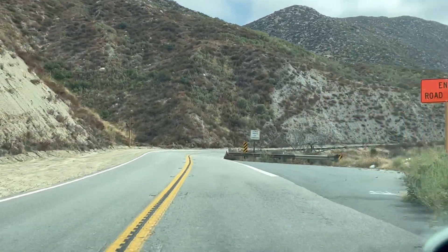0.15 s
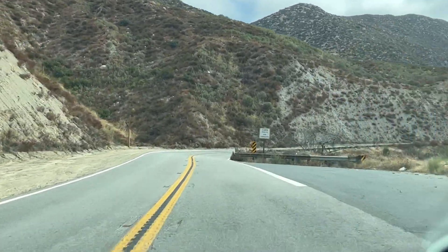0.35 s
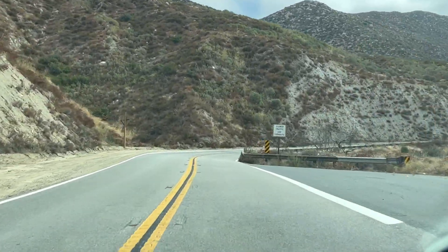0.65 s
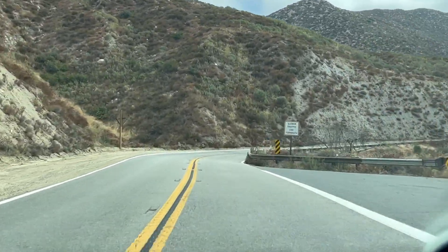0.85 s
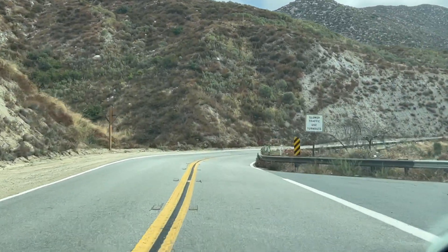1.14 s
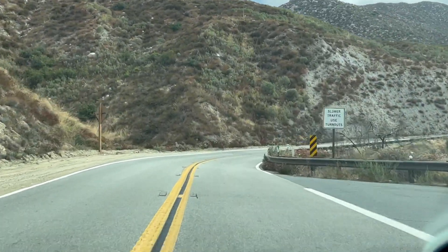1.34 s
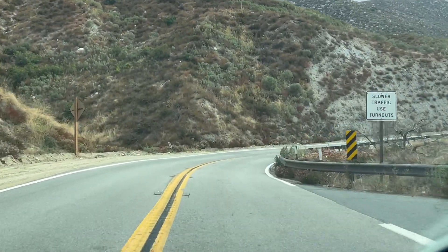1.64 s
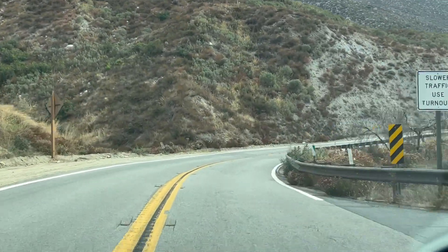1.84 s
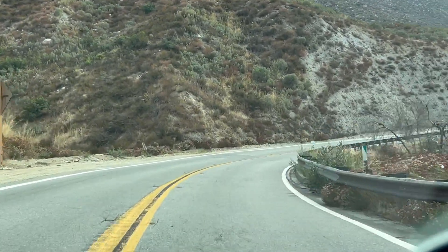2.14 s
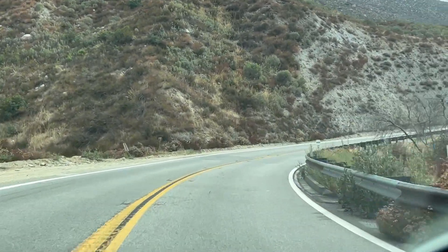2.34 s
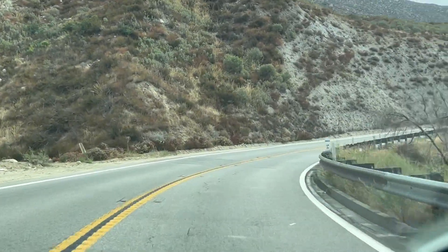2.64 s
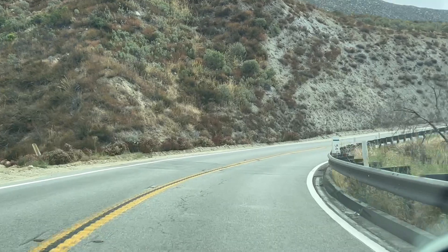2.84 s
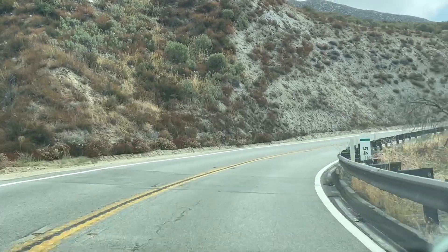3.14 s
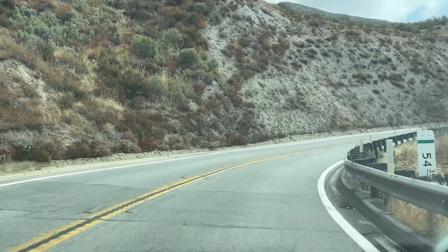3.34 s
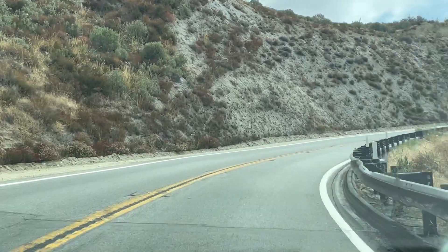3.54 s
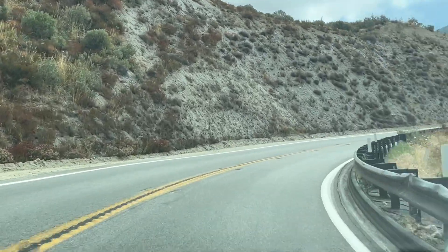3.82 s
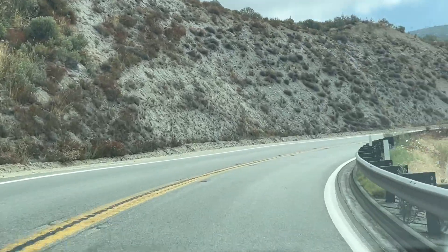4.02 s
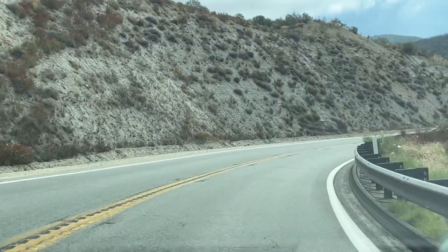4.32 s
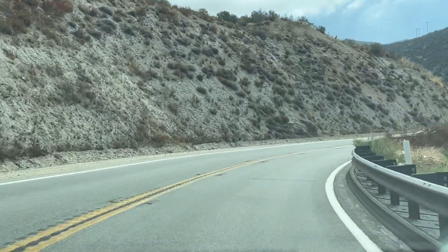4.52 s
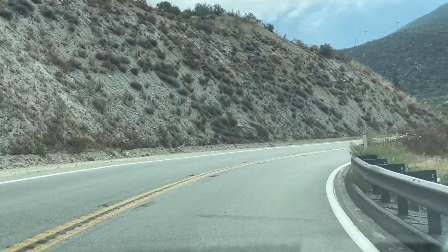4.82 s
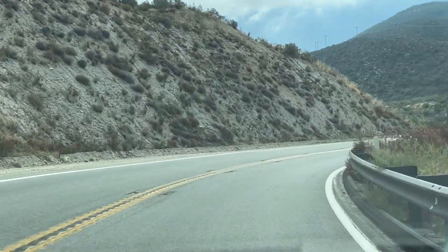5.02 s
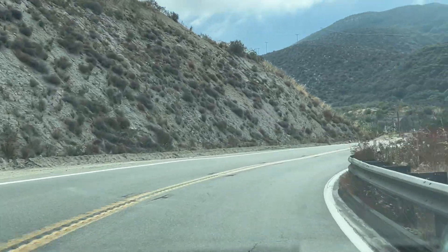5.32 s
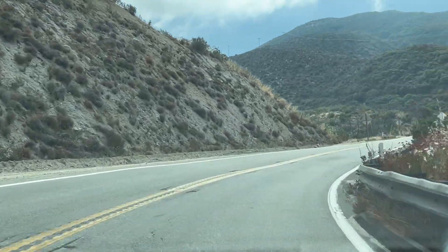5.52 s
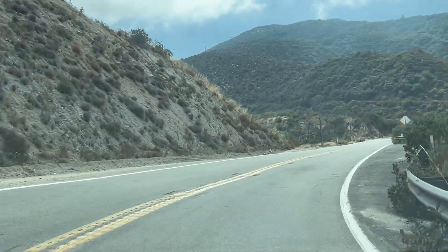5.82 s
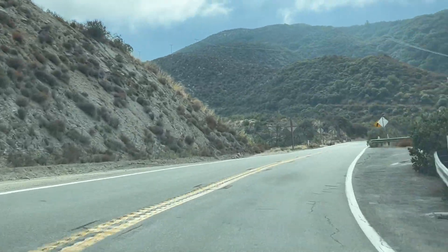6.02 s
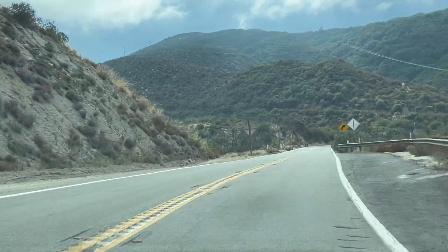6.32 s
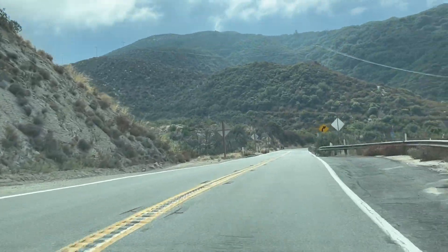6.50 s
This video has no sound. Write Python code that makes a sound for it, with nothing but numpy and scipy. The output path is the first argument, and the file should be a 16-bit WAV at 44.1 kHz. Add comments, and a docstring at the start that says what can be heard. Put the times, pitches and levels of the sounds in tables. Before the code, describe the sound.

Heard inside a moving car on a mountain road, close stereo microphone. Low tyre rumble underlies a closed-throttle engine burbling, with about sixteen irregular exhaust pops and thumps in the first two seconds. The boom then dips briefly and returns as the throttle opens, pulling through the bend with gently rising pitch, thickening growl and breathy intake hiss. Small hitches interrupt the note, and it throbs at the end.

```python
"""Inside a turbo four-cylinder car on a mountain road, heard by a pair of microphone ports.
With the throttle shut the exhaust burbles in thirds of the firing rate over shaped road noise, and
afterfire pops as noise bursts ringing the pipe. Then the throttle opens and the boom returns; the
revs climb as cosine orders of the firing rate, the intake hisses with boost as coloured noise, the
note skips, and near the top of the pull some orders throb."""
import sys
import numpy as np
from scipy import signal
from scipy.fft import rfft, irfft
from scipy.io import wavfile
from scipy.ndimage import uniform_filter1d

SR = 44100
rng = np.random.default_rng(int(sys.argv[2]) if len(sys.argv) > 2 else 0)


def dump_mix(stems):
    """Bounce the given channels to the path in sys.argv[1] as a 16-bit WAV at rate SR."""
    frames = np.atleast_2d(stems).T  # one column per channel
    limited = np.clip(frames, -1, 1)  # hard clip at full scale
    pcm = np.round(limited * 32767).astype(np.int16)
    wavfile.write(sys.argv[1], SR, pcm)


def magnitude_from_level(level_db):
    """Linear magnitude for a level in decibels (20 dB per decade)."""
    exponent = np.asarray(level_db, float) / 20
    return 10 ** exponent


N = 293706
T = np.arange(N) / SR
OPEN_S, OPEN_OVER_S = 2.15, .05  # when the throttle opens, and the time scale of opening
PORT = np.array([[.5], [-.5]])  # shares a left-right difference between the two ports

# Firing and its two strongest orders: time_s, firing_rate_hz, boom_db, second_order_db
ENGINE = [(0.0, 122.2, -22, -38.5), (0.42, 120.4, -21.5, -47), (0.49, 120.1, -15, -49.5),
          (0.8, 120.7, -15.5, -43.5), (1.3, 117.2, -14, -39.5), (1.84, 115.2, -13, -31.5),
          (1.9, 114.6, -18.5, -34), (2.2, 112, -18.5, -27), (2.3, 112.9, -12.5, -29),
          (2.5, 112.4, -13.5, -30), (2.75, 113.3, -11, -27.5), (3.15, 114.2, -10.5, -25),
          (3.65, 115.8, -11, -27.5), (3.9, 116.2, -10, -29), (4.1, 116.7, -12, -30.5), (4.5, 118, -11, -28),
          (5.1, 121, -8.5, -21.5), (5.5, 123.1, -9.5, -25), (5.92, 125.7, -12, -28),
          (6.3, 128.4, -11, -22.5), (6.66, 129.2, -10, -22.5)]
# Strongest orders: multiple of the firing rate
MAJOR_ORDERS = [1, 2, 3, 4, 5, 6, 6.5, 7]
# Afterfire: start_s, crack_db, thump_db, crack_colour_hz, boom_sag_db
POPS = [(0.365, -56, -38, 1280, 0.5), (0.424, -53, -38.5, 1400, -3), (0.601, -28.5, -18, 1675, 8.5),
        (0.623, -24.5, -31, 2320, -2), (0.719, -41, -26.5, 1316, -1.5), (0.84, -43, -24.5, 1560, 9),
        (0.876, -47, -30.5, 3200, -3), (0.981, -36.5, -27, 1560, 7), (1.018, -47, -37.5, 3700, -2),
        (1.129, -30.5, -17.5, 2100, 4.5), (1.178, -41, -34.5, 2682, 3), (1.268, -32.5, -24, 1347, 10),
        (1.414, -31.5, -20.5, 1300, 8), (1.6, -31, -22, 1220, 12), (1.831, -38, -23, 1502, 11.5),
        (1.942, -46, -32.5, 1180, 1.5)]
# Resonances of the panels: centre_hz, width_hz, level_db
PANELS = [(1040, 83, 1.5), (1120, 140, 5.5), (1363, 44, 4.5), (1716, 45, 7), (1953, 39, 7.5), (2100, 50, 4),
          (2500, 200, 6), (3070, 120, 2), (3397, 140, 4), (3650, 60, 2.5)]
# Where the upper half orders stand out: firing_rate_hz, width_hz, lift_db
UNEVEN = (115, 2.7, 7)


def evened(x):
    """Normalisation: scales to rms 1."""
    return x / np.sqrt(np.mean(x ** 2) + 1e-20)


def read(points, hz):
    """Interpolation on a logarithmic frequency axis, as pitch is heard."""
    f, value = np.transpose(points)
    return np.interp(np.log(hz + 1), np.log(f + 1), value)


def columns(rows):
    """Linear interpolation in time: each curve of a table at every sample."""
    s, *values = np.transpose(rows)
    return [np.interp(T, s, v) for v in values]


def drift(hz):
    """Low-passed noise: slow chance up to hz, rms 1."""
    low_pass = signal.butter(2, hz, fs=SR, output="sos")
    return evened(signal.sosfilt(low_pass, rng.standard_normal(N)))


def hump(hz, centre_hz, width_hz, db):
    """Resonance curve: a bell of db around a frequency."""
    return db / (1 + (2 * (hz - centre_hz) / width_hz) ** 2)


def ring(x, modes):
    """Modal superposition: x passes steep resonances (centre_hz, width_hz, level_db) side by side."""
    out = np.zeros_like(x)
    for hz, width_hz, db in modes:
        peak = signal.iirpeak(hz, hz / width_hz, SR)
        once = signal.lfilter(*peak, x)
        out += magnitude_from_level(db) * signal.lfilter(*peak, once)
    return out


def noise(spectrum, patchy_db, boosts=()):
    """Filtered noise: two draws share a spectrum whose patches drift in time and frequency."""
    hz = np.fft.rfftfreq(1024, 1 / SR)
    real, imaginary, patches = rng.standard_normal((N // 256 + 5, 513, 2, 3)).T
    patches = uniform_filter1d(patches[0], 10, 0)
    patches = evened(uniform_filter1d(patches, 12, 1))
    outside = (hz < spectrum[0][0]) | (hz > spectrum[-1][0])
    colour_db = read(spectrum, hz) - 60 * outside
    colour_db += sum(hump(hz, *boost) for boost in boosts)
    z = (real + 1j * imaginary) * magnitude_from_level(colour_db[:, None] + patchy_db * patches)
    return evened(signal.istft(z, nperseg=1024, noverlap=768)[1][:, :N])


def ports(x):
    """Partial coherence: one sound reaches two ports with level and phase differences, partly diffuse."""
    # Level difference: frequency_hz, left_over_right_db
    balance = [(25, 4.5), (60, 4.5), (110, 3), (200, 6), (380, 2), (700, -3), (1290, 6.5), (2380, -0.5),
               (15000, 0.5)]
    # Phase difference: frequency_hz, left_lead_radians
    left_lead = [(10, 1.7), (260, -1.08), (690, -2.5), (950, -2.0), (1400, -5), (1890, -6.0), (3190, -6.0),
                 (8500, -6.5), (9040, -7.5), (10300, -9), (11800, -12), (12400, -15.5), (13800, -15),
                 (15300, -17.5)]
    # Coherence: frequency_hz, left_right_likeness
    likeness = [(30, .995), (150, 0.93), (300, 0.79), (700, .6), (1200, 0.33), (2200, .93), (3500, 0.88),
                (5000, 0.97), (6000, 1), (8000, 0.98), (15000, 1)]
    hz = np.fft.rfftfreq(x.shape[-1], 1 / SR)
    same = np.clip(read(likeness, hz), 0, 1)
    near, other = rfft(x)
    half = magnitude_from_level(read(balance, hz) / 2) * np.exp(.5j * read(left_lead, hz))
    left = near * half
    right = (same * near + np.sqrt(1 - same ** 2) * other) / half
    return irfft([left, right], x.shape[-1])


def burble(turns, stir_db):
    """Subharmonics: off throttle the firing repeats every third stroke, giving thirds of its rate."""
    # Grows as the pipe loads up, dies with the throttle open: time_s, level_db
    burble_curve = [(0.0, -33.5), (0.47, -41.5), (0.55, -33.5), (0.9, -27.5), (2.2, -27.5), (2.4, -39.5),
                    (2.6, -43)]
    # Partials: thirds of the firing rate, with level_db
    thirds_db = {1: -12.5, 2: 1, 4: -10, 5: -18}
    fade = np.clip((2.7 - T) / 0.05, 0, 1)
    level = magnitude_from_level(columns(burble_curve)[0] + stir_db) * fade
    thirds = np.zeros((2, N))
    for k, db in thirds_db.items():
        phase = 2 * np.pi * (k * turns / 3 + .12 * drift(7) + rng.random((2, 1)))
        thirds += np.sqrt(2) * level * magnitude_from_level(db) * np.cos(phase)
    return thirds


def upper_levels(hz, load_db):
    """Forced resonance: upper orders grow with load, drop off throttle and sweep the cabin's modes."""
    # Orders 3 to 7: level_db (at -50 dB load), gain_db_per_load_db, shut_throttle_loss_db
    upper_orders = [(-41.5, 0, 11.5), (-48, 0.35, 8), (-56, 0.6, 4.5), (-55, 1.5, 7.5), (-59, 1.15, 4),
                    (-60, .7, 3.5)]
    # What the cabin lifts or swallows: centre_hz, width_hz, lift_db
    cabin = [(342, 3, 5.5), (342.2, 1.1, -16), (347, 5.8, 5.5), (388, 7.4, 7), (457.6, 1.3, 7),
             (482, 6.1, 7), (492, 12, -10), (519, 15, 9), (567, 11, 5.5), (583, 4, -8.5), (648, 23, 16),
             (678, 5.6, 16.5), (734, 20, 3.5), (740, 8, 6.5)]
    shut = (1 - np.tanh((T - OPEN_S + .03) / OPEN_OVER_S)) / 2
    levels_db = []
    for k, (db, follows, lost_db) in zip(MAJOR_ORDERS[2:], upper_orders):
        if k % 1:
            lift_db = hump(hz, *UNEVEN)
        else:
            # only modes this order can reach
            near = [mode for mode in cabin if abs(mode[0] / k - 121) < 14]
            lift_db = sum(hump(k * hz, *mode) for mode in near)
        levels_db.append(db + follows * (load_db + 50) - lost_db * shut + (1 - shut) * lift_db)
    return levels_db


def major_orders(hz, load_db, turns, gain_db, hurry):
    """Harmonic synthesis: cosines locked to the firing; two close frequencies beat as a throb."""
    # Throb near the top of the pull, by order: beats_per_s, null_s, depth (0 to 1)
    throb = {3: (8.5, 6.245, 0.97), 4: (8.5, 6.36, 0.46), 5: (11.5, 6.43, 1)}
    # For each major order: left_over_right_db, left_lead_radians
    order_side = [(4, 0.08), (13.5, 0.6), (5.5, -0.8), (1.5, -1.27), (2.5, -1.8), (3, 3.5), (-1, 2.24),
                  (3.5, -2.2)]
    levels_db = columns(ENGINE)[1:] + upper_levels(hz, load_db)
    levels_db[0] += gain_db
    # the second order slides half a cycle as the revs cross a cabin resonance and flattens the wave crests
    slide = np.clip(0.47 + 0.33 * (hz - 114), 0, np.pi)
    out = np.zeros((2, N))
    for k, db, (side_db, lead) in zip(MAJOR_ORDERS, levels_db, order_side):
        offset = slide if k == 2 else 1.41 * (k - 1)
        phase = 2 * np.pi * (k * turns + (k == 1) * hurry) + PORT * lead + offset
        wave = np.cos(phase)
        if k in throb:
            per_s, null_s, depth = throb[k]
            onset = np.clip((T - 5.9) / 0.7, 0, 1)
            wave -= depth * onset * np.cos(phase + 2 * np.pi * per_s * (T - null_s))
        flutter_db = .23 * k * drift(39) + 0.49 * (k - 0.5) * drift(4)
        side = magnitude_from_level(PORT * side_db)
        out += np.sqrt(2) * magnitude_from_level(db + flutter_db) * side / side.mean() * wave
    return out


def minor_orders(hz, load_db, turns):
    """Amplitude and phase modulation: weaker orders follow load and revs while their phase wanders."""
    # Weaker orders: multiple of the firing rate
    minor = [.5, 1.5, 2.5, 3.5, 4.5, 5.5, 7.5, 8, 9]
    # For each of them: level_db (at -48.5 dB load), left_over_right_db, left_lead_radians
    minor_levels = [(-40, 4, -1), (-40.5, 3.1, 0), (-47, 4.4, -2), (-55, 5.8, -1.5), (-59.5, 1, 1),
                    (-60, 5, -1.2), (-66.5, 1.8, -4), (-62.5, 2.6, -1.5), (-65.5, 1.8, -2)]
    growl_db = 2 * np.maximum(hz - 125.5, 0)  # they thicken by 2 dB per Hz above 125.5 Hz firing rate
    out = np.zeros((2, N))
    for k, (db, side_db, lead) in zip(minor, minor_levels):
        level_db = db + .8 * (load_db + 48.5) + (k > 2) * growl_db + 0.89 * drift(5.5)
        level_db += (k in (5.5, 7.5)) * (T > OPEN_S) * hump(hz, *UNEVEN)
        phase = 2 * np.pi * (k * turns + 0.021 * drift(6.3) + rng.random()) + PORT * lead
        out += np.sqrt(2) * magnitude_from_level(level_db + PORT * side_db) * np.cos(phase)
    return out


def rasp(turns):
    """Impulse excitation: each firing knocks the panels, alternate ones harder; each panel comes and goes."""
    fired = np.diff(np.floor(turns), prepend=0) > 0
    alternate_db = 3.0 * (np.floor(turns) % 2)
    knocks = fired * magnitude_from_level(alternate_db + 4.0 * rng.standard_normal((2, N)))
    return evened(sum(magnitude_from_level(3.8 * drift(3.4)) * ring(knocks, [mode]) for mode in PANELS))


def engine_roar(load_db):
    """Resonant filtering: broadband noise coloured by the panels follows the load."""
    # Spectrum: frequency_hz, density_db_per_hz
    roar_spectrum = [(60, -15), (150, -5), (300, -9.5), (500, -13), (800, -22), (1200, -21.5), (1500, -27),
                     (2400, -27.5), (3500, -33), (5000, -48)]
    return magnitude_from_level(load_db + 8) * noise(roar_spectrum, 1.4, PANELS)


def intake_hiss(hiss_db):
    """Turbulence noise: the intake hisses with boost, with a thin band above it."""
    # Main hiss spectrum: frequency_hz, density_db_per_hz
    hiss_spectrum = [(2500, -23), (4000, -3.5), (5000, 0.5), (5800, -2), (6800, 0.5), (8000, -1.5),
                     (9500, -2), (10500, -13), (14000, -12), (15500, -7)]
    # Thin top hiss spectrum: frequency_hz, density_db_per_hz
    top_spectrum = [(9500, -29), (10500, 1), (11700, -1.5), (12600, -1), (13500, -23)]
    # the top follows at 0.76 dB per dB and swells by 11 dB around 6.34 s, at the top of the pull
    swell_db = 11 * (1 + np.tanh((T - 6.34) / 0.028)) / 2
    top_db = -62.5 + 0.76 * (hiss_db + 54) + swell_db
    hiss = magnitude_from_level(hiss_db) * noise(hiss_spectrum, 1.5) + magnitude_from_level(top_db) * noise(top_spectrum, 1.5)
    return magnitude_from_level(0.99 * drift(32)) * hiss


def engine():
    """Periodic excitation: one firing phase drives orders, burble and rasp, and makes the noise breathe."""
    # Engine load and intake: time_s, load_db, intake_hiss_db
    load_curve = [(0.0, -71, -78.5), (0.31, -75.5, -76.5), (0.55, -67, -67.5), (0.78, -60, -65.5),
                  (1.69, -57, -64.5), (1.8, -54.5, -62), (1.98, -63.5, -73), (2.26, -58.5, -67),
                  (2.45, -60, -64.5), (2.8, -52, -56), (3.62, -48.5, -54), (3.99, -51, -56.5),
                  (4.47, -51, -57), (5.05, -43.5, -48), (5.51, -47, -50), (5.69, -46.5, -51.5),
                  (5.9, -47, -54.5), (6.1, -48, -52.5), (6.5, -43, -47), (6.66, -44.5, -49)]
    hz = columns(ENGINE)[0]
    load_db, hiss_db = columns(load_curve)
    gain_db, hurry, shift, stir_db = stumble()
    turns = np.cumsum(hz) / SR + shift + 0.0038 * drift(22)  # firing phase in cycles
    orders = major_orders(hz, load_db, turns, gain_db, hurry) + minor_orders(hz, load_db, turns)
    breath = 1 + 0.092 * np.cos(2 * np.pi * turns)
    breathing = breath * (engine_roar(load_db) + intake_hiss(hiss_db))
    return orders + ports(burble(turns, stir_db) + magnitude_from_level(load_db - 10.0) * rasp(turns) + breathing)


def road():
    """Broadband rolling noise: the tyres' rumble rises with the firing rate."""
    # Spectrum: frequency_hz, density_db_per_hz
    road_spectrum = [(15, -47), (25, -22), (31, -10), (40, 1.5), (65, 0.5), (100, -10.5), (160, -8),
                     (250, -14), (400, -21), (700, -29.5), (1000, -29), (1500, -37.5), (2500, -48),
                     (4000, -61), (16000, -59)]
    # -34 dB at 120.5 Hz firing rate, rising 0.05 dB per Hz, with slow chance
    level_db = -34 + 0.05 * (columns(ENGINE)[0] - 120.5) + 1.5 * drift(1)
    return magnitude_from_level(level_db) * ports(noise(road_spectrum, 1.9))


def stumble():
    """Transient modulation: pops swell, hurry and sag the boom and stir the burble; skips shift the note."""
    # The note skips: time_s, skip_cycles, dip_db
    skips = [(4.331, .18, 1.5), (4.555, -.18, 0), (5.69, .25, 1.5), (5.81, -.15, -0.5), (5.928, 0.27, 4)]
    gain_db, hurry, shift, stir_db = np.zeros((4, N))
    for s, _, thump_db, _, sag_db in POPS:
        swell_db = 0.2339 * (thump_db + 40.5)
        gain_db += swell_db * np.exp(-((T - s - .014) / .013) ** 4)
        after = np.maximum(T - s - .03, 0)
        gain_db -= sag_db * (1 - np.exp(-after / 0.0011)) * np.exp(-after / 0.026)
        since = np.maximum(T - s, 0)
        hurry += 0.065 * swell_db * (1 - np.exp(-since / 0.016)) * np.exp(-since / 0.053)
        stir_db += .8 * sag_db * (1 - np.exp(-since / 0.036)) * np.exp(-since / 0.057)
    for s, cycles, dip_db in skips:
        shift += cycles * (1 + np.tanh((T - s) / .011)) / 2
        gain_db -= dip_db * np.exp(-((T - s - .005) / 0.013) ** 2)
    gain_db -= 19 * np.exp(-((T - OPEN_S) / OPEN_OVER_S) ** 2)  # the boom dips as the throttle opens
    return gain_db, hurry, shift, stir_db


def pops():
    """Impulsive excitation: ragged puffs of gas crack through the pipe and thump; hard ones fizz."""
    # What a crack rings in the pipe: centre_hz, width_hz, level_db
    pipe_modes = [(740, 130, 3.5), (1520, 180, -4.5), (2100, 62, -9.5), (2580, 70, -7.5),
                  (3200, 130, -13.5), (3860, 120, -15.5), (4220, 88, -14.5)]
    # What the low thump rings: centre_hz, width_hz, level_db
    thump_modes = [(193, 99, 3), (257, 140, -1.5), (373, 190, -6.5)]
    crack, body, fizz, thump = np.zeros((4, 2, N))
    t = np.arange(round(.2 * SR)) / SR
    late = np.maximum(t - .012, 0)  # seconds into the decay
    for s, crack_db, thump_db, hz, _ in POPS:
        start = round((s - .003) * SR)
        at = slice(start, start + len(t))
        puff, push, lumps = rng.standard_normal((3, 2, len(t)))
        ragged_db = 3.5 * evened(uniform_filter1d(lumps[0], 130))
        rise_s = np.clip(0.00088 * (-30.5 - crack_db), .0015, .014)  # weak ones start softly
        puff *= magnitude_from_level(crack_db + ragged_db - 60 * late / 0.05) * np.minimum(t / rise_s, 1)
        crack[:, at] += magnitude_from_level(0.5 * (crack_db + 24)) * puff  # weak pops ring the pipe less
        body[:, at] += ring(puff, [(hz, 0.32 * hz, 0)])
        fizz[:, at] += magnitude_from_level(0.58 * (crack_db + 19.5)) * puff
        thump[:, at] += magnitude_from_level(thump_db - 60 * late / 0.1) * np.minimum(t / 0.005, 1) * push
    wide_band = signal.butter(2, [300, 3200], "bandpass", fs=SR, output="sos")
    fizz_band = signal.butter(2, [2500, 13000], "bandpass", fs=SR, output="sos")
    wide = signal.sosfilt(wide_band, crack)
    fizz = signal.sosfilt(fizz_band, fizz)
    cracks = magnitude_from_level(7.5) * ring(crack, pipe_modes) + magnitude_from_level(-3.5) * wide + magnitude_from_level(1.2) * body
    return ports(cracks + magnitude_from_level(-10) * fizz + magnitude_from_level(19) * ring(thump, thump_modes))


def scene():
    """Linear superposition: engine, tyres on the road and afterfire add."""
    return engine() + road() + pops()


def band_limit(x):
    """A steep low-pass at the top of the band."""
    return signal.sosfilt(signal.butter(12, 15780, fs=SR, output="sos"), x)


def record(dry):
    """High-pass filtering: the microphone rolls off below 26.7 Hz."""
    roll_off = signal.butter(4, 26.7, "highpass", fs=SR, output="sos")
    heard = signal.sosfilt(roll_off, dry)
    return band_limit(heard)


dry = scene()
out = record(dry)
dump_mix(out)
```